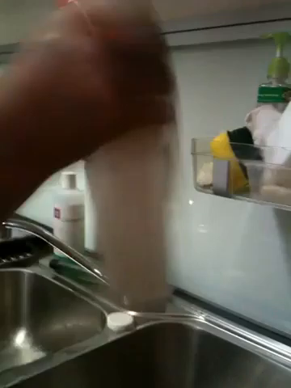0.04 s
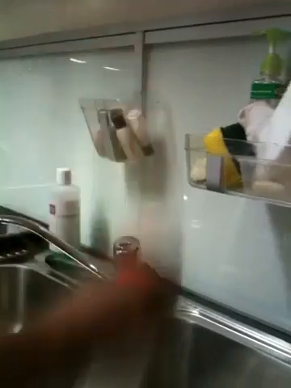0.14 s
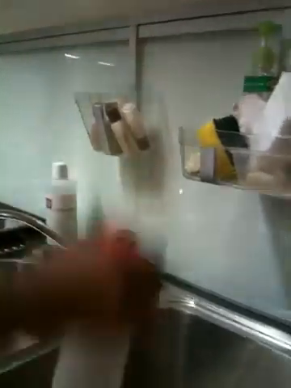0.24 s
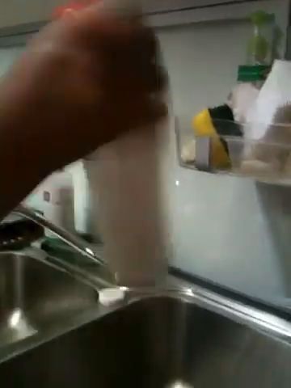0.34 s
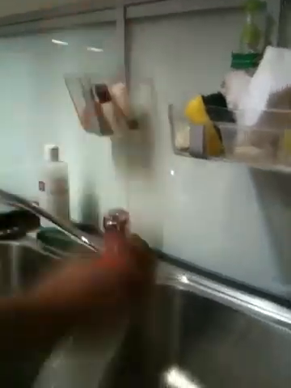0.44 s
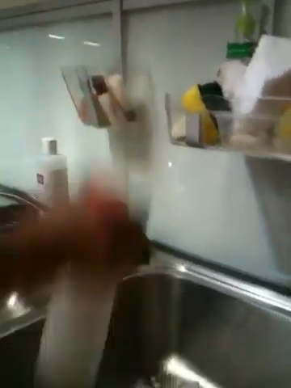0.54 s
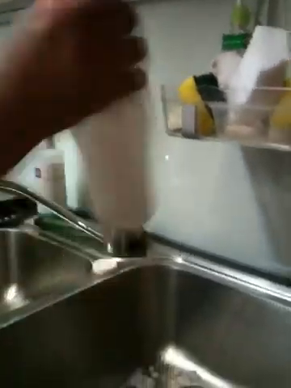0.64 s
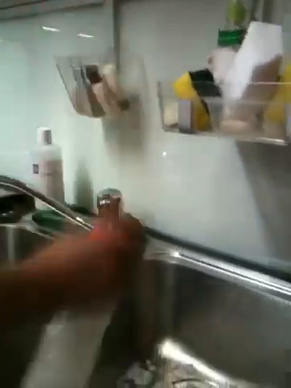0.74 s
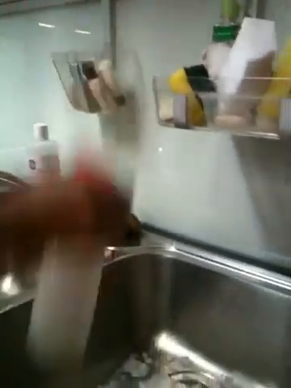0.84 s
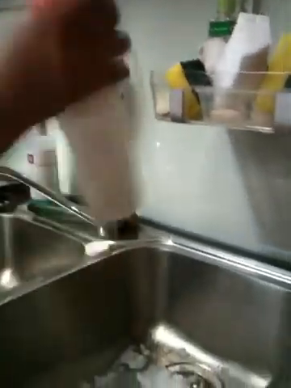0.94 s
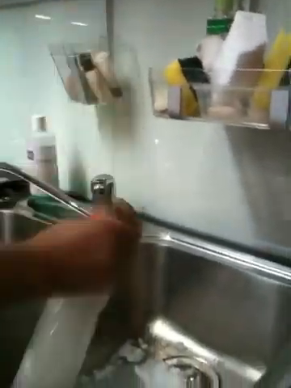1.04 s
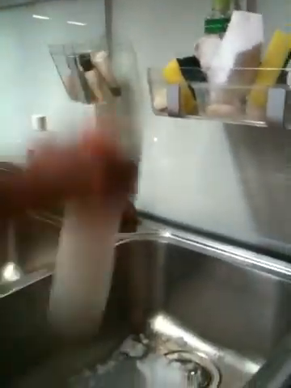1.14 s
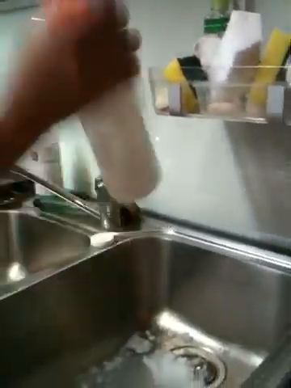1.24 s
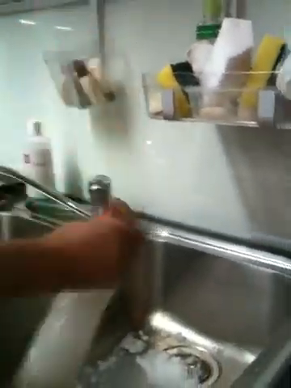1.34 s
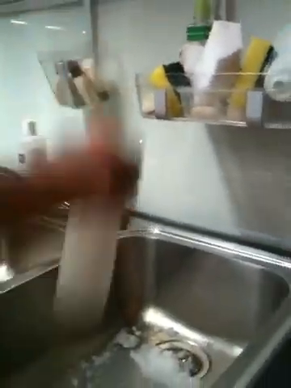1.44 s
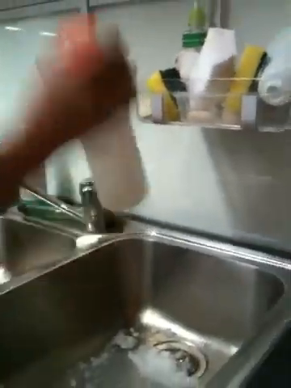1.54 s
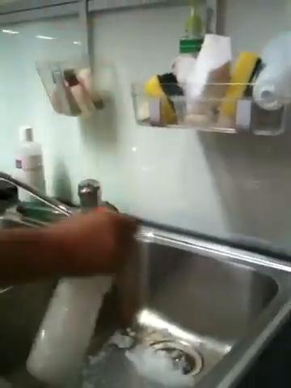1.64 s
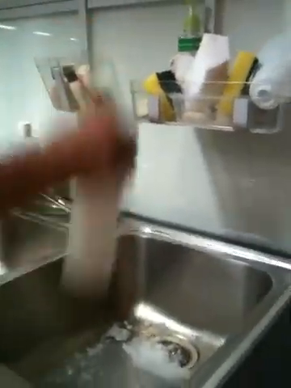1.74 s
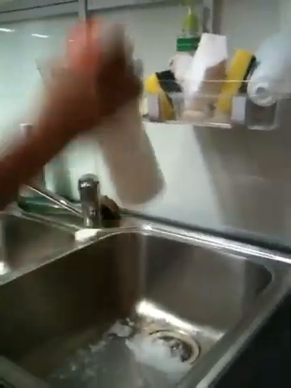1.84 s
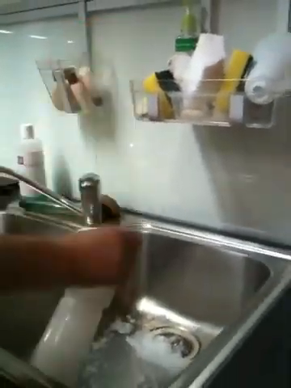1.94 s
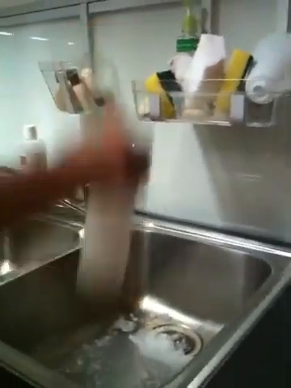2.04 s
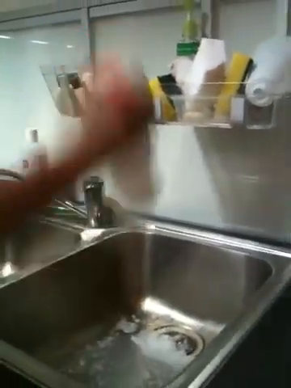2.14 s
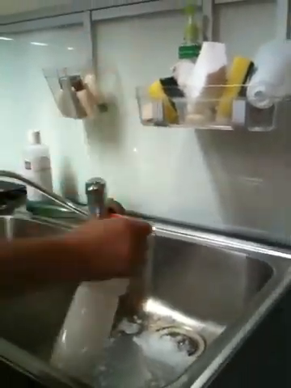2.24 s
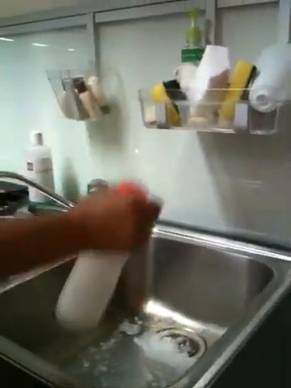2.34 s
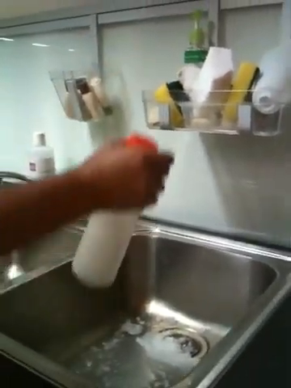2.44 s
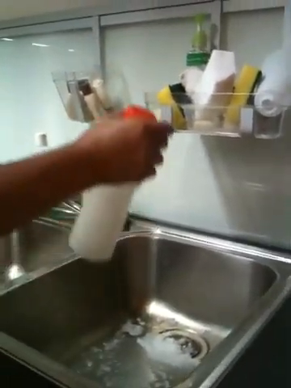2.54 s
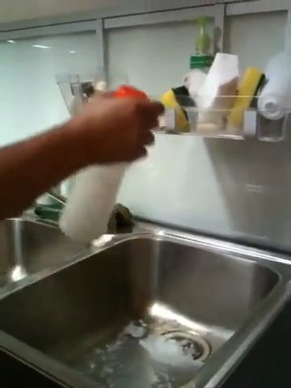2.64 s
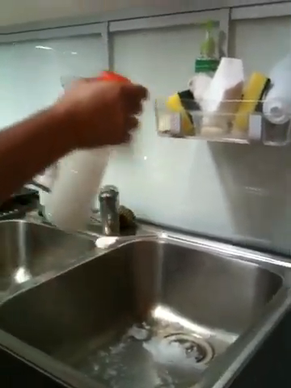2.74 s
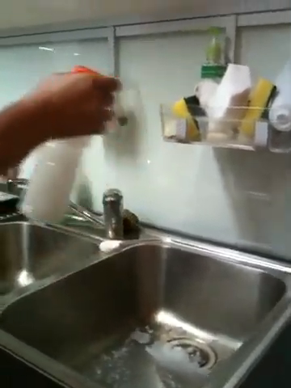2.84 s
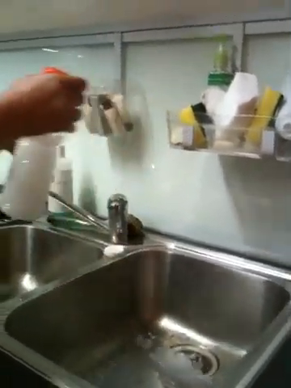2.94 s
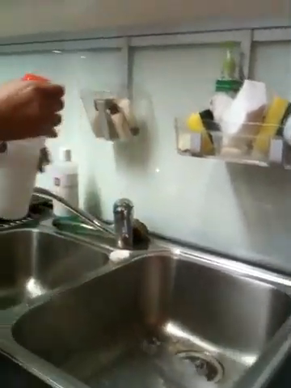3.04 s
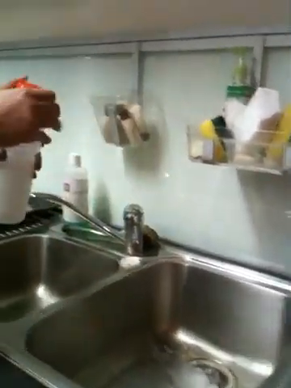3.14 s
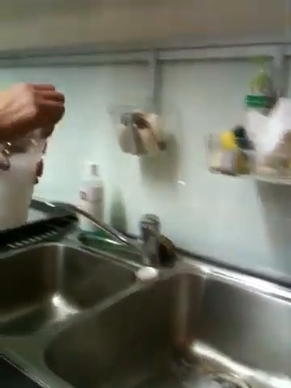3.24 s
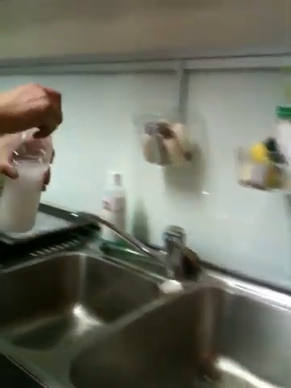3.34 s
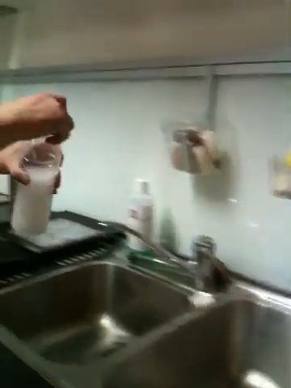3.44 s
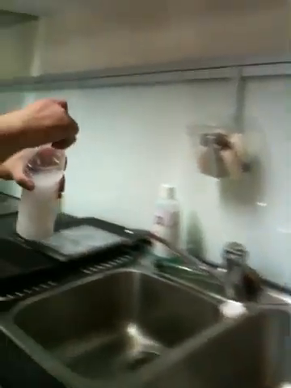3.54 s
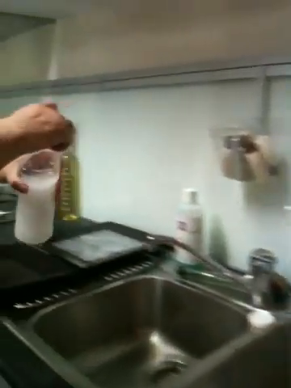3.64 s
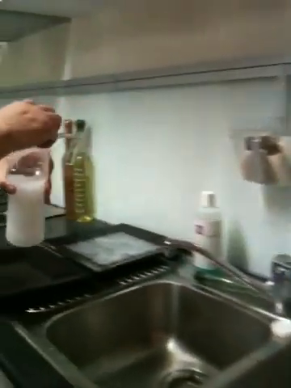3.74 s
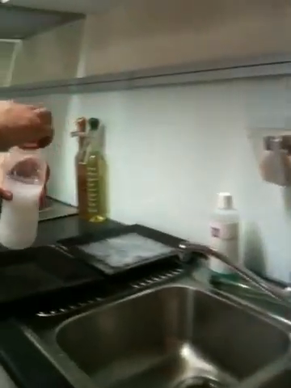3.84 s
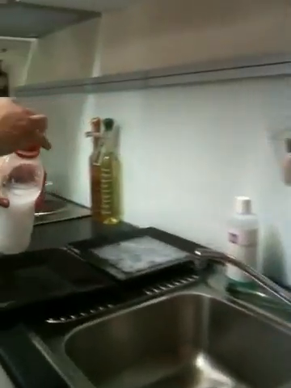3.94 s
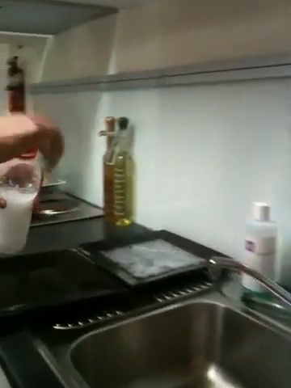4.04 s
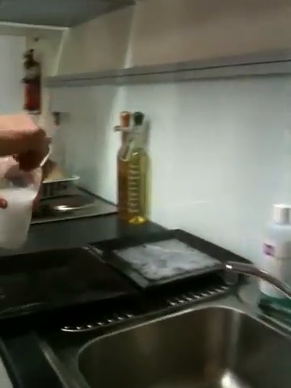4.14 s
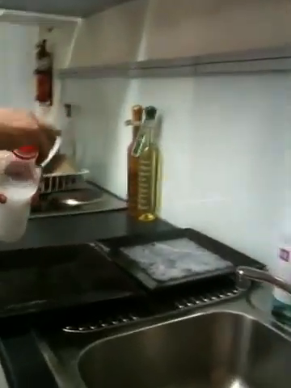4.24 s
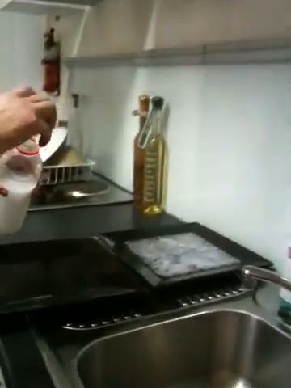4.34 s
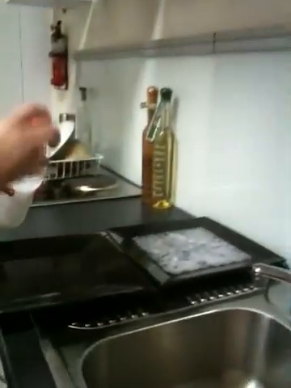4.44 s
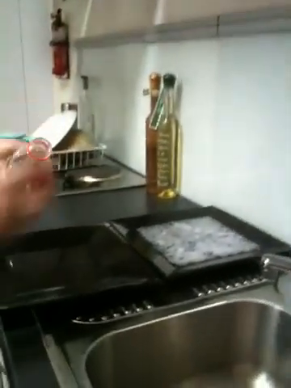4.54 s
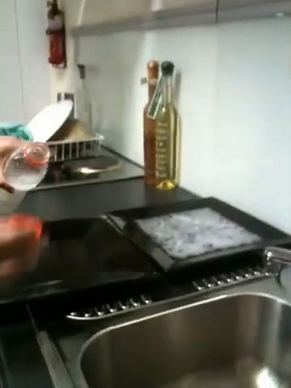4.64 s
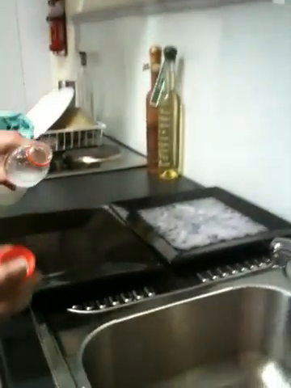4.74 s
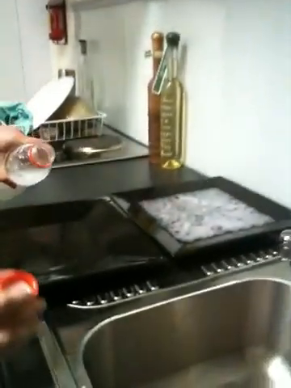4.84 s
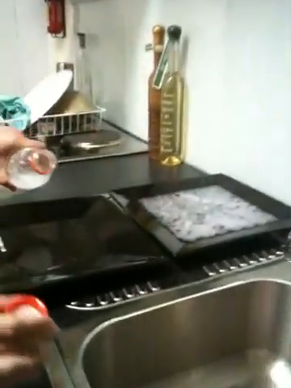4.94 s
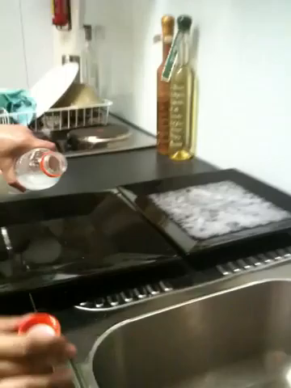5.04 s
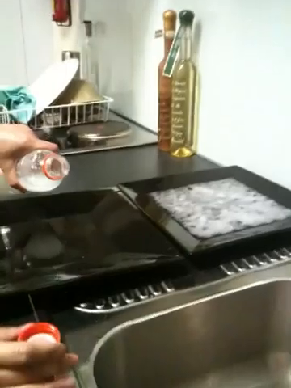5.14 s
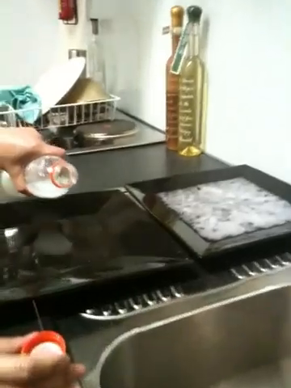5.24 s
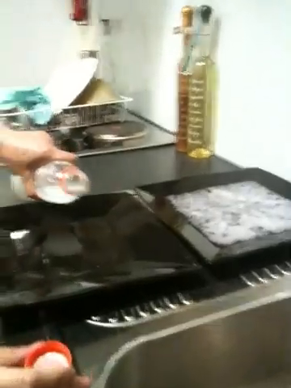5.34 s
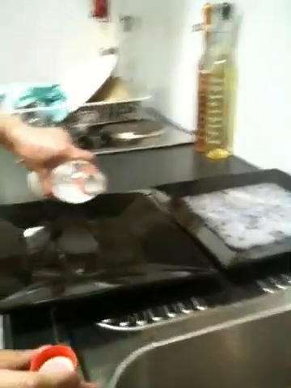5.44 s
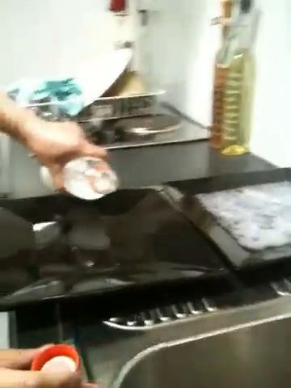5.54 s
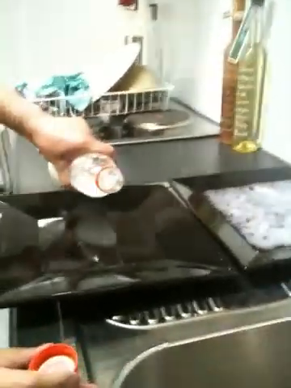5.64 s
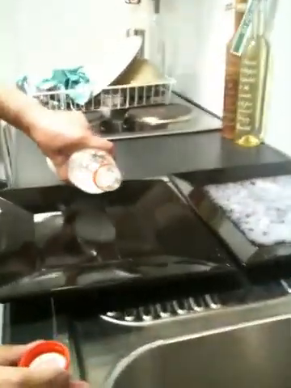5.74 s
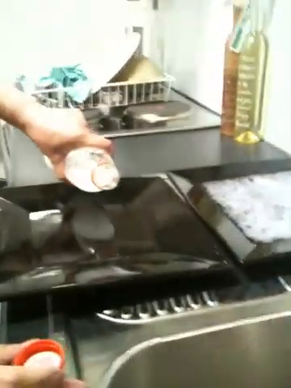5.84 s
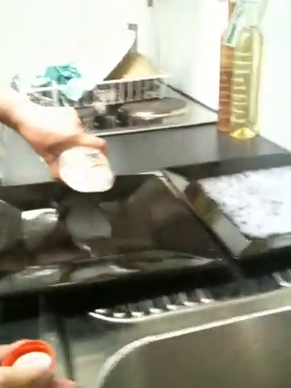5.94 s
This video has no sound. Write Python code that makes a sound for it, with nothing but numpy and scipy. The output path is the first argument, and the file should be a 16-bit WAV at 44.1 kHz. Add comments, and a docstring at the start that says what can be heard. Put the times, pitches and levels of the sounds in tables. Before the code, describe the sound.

A plastic bottle of water and soaked paper is shaken hard close to the microphone, about three strokes a second, each with splashing, wet slaps and hollow gulps. The shaking stops and the water settles with a few plops. Fingers then turn the screw cap, making light clicks, faint squeaks and one sharp crack. A low rumble and faint hum hang in the small tiled kitchen.

```python
"""A tiled kitchen: a plastic bottle of water and soaked paper is shaken hard, three strokes a second. Each
stroke throws the pulp against the wall: spray, slaps and gulping air pockets. The water settles with last ticks
and plops, and fingers turn the screw cap, which clicks while drops ring inside the tilted bottle. A faint hum
and thin whistles hang in the room noise."""
import sys
import numpy as np
from scipy import signal
from scipy.fft import rfft, irfft, next_fast_len
from scipy.io import wavfile
from scipy.ndimage import map_coordinates

SR = 44100
rng = np.random.default_rng(int(sys.argv[2]) if len(sys.argv) > 2 else 0)


def materialize(psi):
    """Save the field psi as 16-bit PCM at rate SR to the path in sys.argv[1].

    A 1-D psi becomes a single channel; in a 2-D psi each row is a channel.
    """
    bounded = np.clip(np.atleast_2d(psi).T, -1, 1)
    quanta = np.round(bounded * 32767).astype(np.int16)
    wavfile.write(sys.argv[1], SR, quanta)


N = 264133

# house rumble (frequency [Hz], relative density [dB])
RUMBLE_SPECTRUM = [(15, -90), (25, -66.5), (69, -28.5), (110, -18), (152, -7.5), (264, -9), (400, -11.5),
                   (499, -13.5), (600, -18.5), (831, -19.5), (4000, -41), (8800, -120)]
# hum that drops out and returns (time [s], level [dB])
HUM_LEVELS = [(3.1, -66.5), (3.5, -88), (3.77, -68.5), (3.95, -65), (4.45, -61.5), (5.99, -64.5)]
# thin whistles (frequency [Hz], level [dB])
WHISTLES = [(15628, -73), (15030, -80.5)]
# decay of the tiled room (frequency [Hz], t60 [s])
ROOM_DECAY = [(200, 0.53), (2000, 0.51), (7000, 0.28), (14000, 0.19)]
# preamp hiss (frequency [Hz], relative density [dB])
HISS_SPECTRUM = [(1000, -2.5), (3000, -0.5), (8000, -4), (12000, -4.5), (15500, -4.5), (16200, -23.5),
                 (17000, -18)]
# cavities in front of the microphone (frequency [Hz], width [Hz], lift [dB])
MIC_CAVITIES = [(2435, 810, 6), (6595, 700, 12.5)]
# struck or rubbed plastic (frequency [Hz], relative density [dB])
PLASTIC_SPECTRUM = [(200, -92.5), (700, -34), (1200, -3), (2500, 2.5), (5000, -2), (9000, -10.5),
                    (13000, -9), (17000, -41)]
# fingers rubbing the cap (time [s], level [dB])
RUB_LEVELS = [(2.7, -93), (2.93, -78), (3.15, -73.5), (3.27, -70), (3.42, -72.5), (3.5, -75), (3.7, -84),
              (4.1, -85), (4.26, -68), (4.43, -78.5), (4.7, -87)]
# hand bumping the bottle (time [s], level [dB], t60 [s])
HAND_BUMPS = [(3.092, -52.5, 0.38), (3.255, -47, 0.039), (3.47, -58, 0.12), (3.58, -50.5, .1),
              (3.615, -56.5, 0.77), (3.91, -41, 0.074)]
# cap resonances (frequency [Hz], width [Hz], gain [dB])
CAP_MODES = [(2260, 500, -7), (2740, 500, -10), (3406, 630, -12), (6380, 950, -5), (7430, 1600, -5.5)]
# last water ticks, then cap clicks
# (time [s], level [dB], brightness [dB], hollow ring [dB], rise [s], t60 [s])
SHARP_TICKS = [(2.552, -54.5, -2, -4, .002, 0.069), (2.563, -45, -7.5, -10, 0.00091, 0.038),
               (2.862, -68, -13, -3.5, .0015, 0.15), (2.893, -66, -19, 8, .001, 0.044),
               (3.092, -56.5, -5.5, 4, .001, 0.038), (3.181, -56, -13, -2, .002, 0.048),
               (3.195, -57.5, -20, 0, .0015, .05), (3.215, -54.5, -15, 1, .0015, 0.073),
               (3.235, -55, -3, -6, .002, .088), (3.253, -49, -2, -8, .002, .04),
               (3.3, -58, -2, 1, .003, 0.036), (3.3337, -47, -5, 4, 0.00068, 0.067),
               (3.381, -54, -8, 2, .0015, .045), (3.394, -65, -10, 13, .0015, .034),
               (3.411, -63, -20, 13.5, .0015, 0.041), (3.646, -62, -13, 1, .001, 0.056),
               (3.7176, -32, 6.5, -11.5, 0.0024, 0.031), (3.721, -34, 10.5, -12, 0.0019, .025),
               (3.7274, -46, 11, -10.5, 0.0018, 0.028), (3.825, -58.5, 10, -8, .001, 0.025),
               (3.904, -43.5, -4.5, 1.5, 0.0015, 0.044), (3.915, -42, -13, 2.5, 0.00036, 0.085),
               (4.017, -55, -8, -7.5, .0015, 0.032), (4.038, -47.5, -6.5, 3, .0009, 0.065),
               (4.139, -61, 1, -6, .0005, 0.038), (4.191, -51, -5, -1.5, 0.00073, 0.055),
               (4.254, -56.5, -15, -2, .004, .12), (4.305, -55, -12, 5, 0.0035, .07),
               (4.371, -51, -7, 8, 0.00052, 0.048), (4.83, -61.5, -12, -4, .001, .047),
               (5.525, -65.5, -5, -3, .001, .055)]
# water plops and drops settling inside the tilted bottle (time [s], level [dB], pitch [Hz], t60 [s])
PITCHED_RINGS = [(2.511, -42.5, 1610, 0.038), (2.54, -45.5, 1050, .06), (2.611, -54.5, 1020, 0.092),
                 (2.659, -58, 9800, 0.041), (2.765, -67, 8300, .05), (2.925, -56, 1560, .03),
                 (3.254, -53, 1000, .04), (3.647, -60, 920, .065), (4.178, -60.5, 1450, 0.14),
                 (4.254, -61, 1940, 0.15), (4.83, -57, 3510, 0.042), (5.525, -60.5, 2100, 0.059)]
# turns of the downstrokes (time [s], air push [dB], gurgle [dB])
STROKE_TURNS = [(.14, -66, -40), (.434, -82, -46.5), (0.733, -57, -44), (1.033, -58, -43.5),
                (1.322, -74, -48.5), (1.63, -64, -43.5), (1.908, -80, -44.5), (2.199, -61, -43.5)]
# bottle wall and air modes (frequency [Hz], width [Hz], gain [dB])
BOTTLE_MODES = [(105.5, 14, -9.5), (234.7, 35, -1), (489, 77, -5.5), (767, 190, -3), (1040, 120, -2)]
# large air pockets (time [s], level [dB], pitch [Hz], life [s])
AIR_POCKETS = [(.005, -46, 740, 0.04), (.175, -32.5, 483, 0.021), (.146, -42, 480, .02),
               (.175, -37.5, 206, .038), (.215, -38, 793, .03), (.18, -31, 676, 0.02),
               (.445, -45, 489, 0.033), (.468, -33.5, 520, 0.0091), (.485, -40, 729, 0.05),
               (.54, -35, 855, 0.017), (.52, -40.5, 500, .056), (.55, -37, 505.6, 0.056),
               (.585, -38, 232, 0.024), (.731, -43, 600, .02), (.745, -34.5, 340, 0.026),
               (.765, -32, 699, 0.036), (.83, -39.5, 225, 0.032), (.838, -37, 1100, 0.022),
               (1.05, -36, 643, 0.025), (1.055, -43, 195, 0.033), (1.075, -42, 731, .06),
               (1.118, -33, 1066, 0.028), (1.165, -33, 503, 0.015), (1.325, -40, 990, 0.012),
               (1.415, -35.5, 245.3, 0.041), (1.67, -35.5, 735, .031), (1.67, -36, 930, 0.021),
               (1.7, -41, 480, 0.039), (1.952, -35.5, 838, 0.028), (1.952, -37, 1060, 0.019),
               (1.96, -34.5, 235, 0.025), (2.015, -41, 831, 0.036), (2.018, -39.5, 268, 0.037),
               (2.235, -40, 264, 0.029), (2.29, -33.5, 1110, 0.012), (2.292, -37, 776, 0.022),
               (2.29, -40.5, 228.5, 0.044), (2.292, -34, 1634, 0.022)]
# droplet impacts (frequency [Hz], relative density [dB])
SPRAY_SPECTRUM = [(60, -58), (300, -8), (1000, -5), (2000, 2), (4000, -3.5), (8000, -10.5), (12000, -10.5),
                  (15500, -20), (17000, -50)]
# pulp slapping the wall (time [s], level [dB], brightness [dB], t60 [s])
PULP_SLAPS = [(.004, -50, 10, 0.072), (0.147, -39.5, -14, .09), (.161, -44, 4, 0.1),
              (0.2442, -33.5, 6.5, 0.072), (.32, -42, 8, 0.07), (0.419, -38.5, -7, 0.03),
              (.4344, -45, -11, 0.054), (.467, -37, 7.5, 0.099), (.4884, -40, 6, .07), (.5524, -51, 5, .06),
              (0.672, -39, -2, 0.031), (.75, -39, 6.5, 0.083), (.7744, -60, 0, .07),
              (.8424, -47.5, -0.5, 0.053), (1.037, -43, -12, .1), (1.052, -43, 7.5, .1),
              (1.067, -43, 6, 0.13), (1.1014, -39, 8, 0.044), (1.14, -43, -7, 0.091),
              (1.1874, -42, -3, 0.034), (1.2294, -43.5, 2, 0.068), (1.326, -45.5, -4, .08),
              (1.341, -41, 8, 0.095), (1.4394, -56, -1, 0.051), (1.632, -40.5, -5, .07),
              (1.6425, -40.5, 16, 0.064), (1.7987, -40, -23, 0.084), (1.9175, -56, -12, .08),
              (1.948, -43, -5, .11), (2.0223, -47, 6, 0.08), (2.202, -49, -9, .1), (2.221, -37.5, -4, .08),
              (2.2935, -39.5, 10, 0.099), (2.408, -50, -2.5, .06), (2.43, -43.5, -5, 0.051)]
# water thrown to the bottom and back (surge peak [s], rise [s], spray [dB], gulp [dB],
# wait to return [s], return spray [dB], return gulp [dB], spray drain [dB/s])
SURGES = [(-.08, .03, -32, -31, 0.085, -34, -39, 248), (0.188, 0.053, -35.5, -40, 0.083, -33.5, -43.5, 145),
          (.485, 0.043, -34.5, -40, 0.071, -32.5, -40.5, 148),
          (0.776, 0.039, -32.5, -40.5, 0.09, -32.5, -40, 150),
          (1.064, 0.02, -32, -42, 0.099, -35, -40, 168),
          (1.36, .03, -35.5, -44, 0.082, -31.5, -40.5, 148.5),
          (1.655, 0.042, -35, -46, 0.077, -32.5, -41, 160),
          (1.965, 0.056, -36.5, -44.5, 0.074, -33, -42.5, 119),
          (2.228, 0.028, -35, -44, 0.079, -37, -41.5, 112)]

SETTLED_S = 2.6


def amp(db):
    """dB to gain."""
    return 10 ** (np.asarray(db) / 20)


def unit(x):
    """x at rms 1."""
    return x / np.sqrt(np.mean(x ** 2) + 1e-20)


def along(points, hz):
    """Interpolate (Hz, value) points on a log axis."""
    f, v = np.transpose(points)
    return np.interp(np.log(hz + 1), np.log(f + 1), v)


def curve(points):
    """Interpolate (s, value) points per sample."""
    return np.interp(np.arange(N) / SR, *np.transpose(points))


def wobble(rate_hz):
    """Smooth random curve with knots at rate_hz."""
    knots = rng.standard_normal(int(N * rate_hz / SR) + 4)
    return map_coordinates(knots, [np.arange(N) * rate_hz / SR])


def filtered(x, response):
    """Apply a complex frequency response."""
    m = next_fast_len(len(x) + SR // 2)
    return irfft(rfft(x, m) * response(np.fft.rfftfreq(m, 1 / SR)), m)[:len(x)]


def coloured(x, spectrum):
    """x shaped by (Hz, dB) points, rms 1."""
    return unit(filtered(x, lambda hz: amp(along(spectrum, hz))))


def split(x, hz):
    """Low and high part of x."""
    high = filtered(x, lambda f: (1j * f / (hz + 1j * f)) ** 2)
    return x - high, high


def peak(f, hz, width_hz):
    """Causal resonance, gain 1 at its centre."""
    return 1j * f * width_hz / (hz * hz - f * f + 1j * f * width_hz)


def ring(hz, width_hz, samples=SR // 4):
    """Damped plastic or a small air pocket: noise in one resonance."""
    return unit(filtered(rng.standard_normal(samples), lambda f: peak(f, hz, abs(width_hz)) ** 2))


def burst(rise_s, t60_s):
    """Envelope: quick rise, exponential fall."""
    t = np.arange(SR // 4) / SR
    return amp(-60 * t / t60_s) * (1 - np.exp(-t / rise_s))


def struck(envelope, noise):
    """Enveloped noise with the energy of the envelope."""
    sound = envelope[:len(noise)] * noise
    return sound * np.linalg.norm(envelope) / np.linalg.norm(sound)


def add(track, at_s, sound):
    """Mix sound into track."""
    start = round(at_s * SR)
    track[start:][:len(sound)] += sound[:N - start]


def bubbles(at_s, hz, gain, life_s, glide):
    """Sines that swell and die; the pitch slides as the pocket changes size."""
    t = np.arange(SR // 8) / SR
    age = t / np.reshape(life_s, (-1, 1))
    envelope = (3 * age * np.exp(1 - 3 * age)) ** 1.5
    phase = 2 * np.pi * hz[:, None] * t * (1 + np.reshape(glide, (-1, 1)) * age)
    waves = gain[:, None] * envelope * np.sin(phase)
    index = (at_s * SR).astype(int)[:, None] + np.arange(len(t))
    return np.bincount(index.ravel(), waves.ravel(), N + SR)[:N]


def room_noise(rumble_db=-63, hum_hz=300):
    """House rumble, a wavering hum and thin whistles."""
    t = np.arange(N) / SR
    rumble = amp(rumble_db + 0.4 * wobble(6)) * coloured(rng.standard_normal(N), RUMBLE_SPECTRUM)
    hum = amp(curve(HUM_LEVELS) + 2.1 * wobble(8)) * np.sin(2 * np.pi * hum_hz * t + 0.6 * wobble(23))
    whistles = sum(amp(db + 1.5 * wobble(12)) * np.sin(2 * np.pi * hz * t) for hz, db in WHISTLES)
    return rumble + hum + whistles


def tiled_walls(x):
    """Reverberation; each frequency dies at its own rate."""
    hz, t, noise = signal.stft(rng.standard_normal(SR // 2), SR, nperseg=256)
    tail = signal.istft(noise * amp(-60 * t / along(ROOM_DECAY, hz)[:, None]), SR, nperseg=256)[1]
    return signal.fftconvolve(np.pad(x, (200, 0)), tail / np.linalg.norm(tail))[:N]


def air_pushes(swing_hz=36):
    """Each downstroke pushes one slow pressure swing at the microphone."""
    at_s, db, _ = np.transpose(STROKE_TURNS)
    return bubbles(at_s, np.full(len(at_s), swing_hz), amp(db), life_s=0.029, glide=0)


def hand():
    """Fingers rub the cap; the hand bumps the bottle dully."""
    low, high = split(coloured(rng.standard_normal(N), PLASTIC_SPECTRUM), 5000)
    rub = amp(curve(RUB_LEVELS) + 2.9 * wobble(40)) * (low + amp(4.5) * high)
    blows = np.zeros(N)
    for at_s, db, t60_s in HAND_BUMPS:
        add(blows, at_s, amp(db) * burst(0.0014, t60_s))
    body = filtered(rng.standard_normal(N), lambda f: peak(f, 215, 80) + 0.1 * peak(f, 700, 700) ** 2)
    _, bumps = split(blows * unit(body), 120)
    return rub + bumps


def plops_and_drops():
    """Water plops and drops settling inside the bottle: one resonance each, wider if short or high."""
    track = np.zeros(N)
    for at_s, db, hz, t60_s in PITCHED_RINGS:
        width_hz = 8 / t60_s + 0.08 * hz
        add(track, at_s, amp(db) * struck(burst(.002, t60_s), ring(hz, width_hz)))
    return track


def ticks():
    """Last water ticks, then cap clicks: broad cracks and the rings they excite in the plastic."""
    low, high = split(coloured(amp(2.06 * wobble(400)) * rng.standard_normal(N), PLASTIC_SPECTRUM), 4000)
    cracks, rings = np.zeros((2, N))
    modes = [ring(hz, width_hz, samples=N) for hz, width_hz, _ in CAP_MODES]
    for at_s, db, bright_db, hollow_db, rise_s, t60_s in SHARP_TICKS:
        blow = burst(rise_s, t60_s)
        span = slice(round(at_s * SR), round(at_s * SR) + len(blow))
        add(cracks, at_s, amp(db) * struck(blow, low[span]))
        add(cracks, at_s, amp(db + bright_db) * struck(blow, high[span]))
        for (hz, _, mode_db), mode in zip(CAP_MODES, modes):
            ring_db = db + mode_db + (bright_db if hz > 4000 else hollow_db) + rng.normal(0, 2)
            add(rings, at_s, amp(ring_db) * struck(blow, mode[span]))
    return cracks, rings


def churn(rise_db=25.5, sag_db_per_s=90, return_db_per_s=250, drain_db_per_s2=298.5):
    """Spray and gulp levels [dB]: a steep surge that sags, a return, a steepening drain."""
    t = np.arange(N) / SR
    spray_power, gulp_power = np.full((2, N), 1e-12)
    for at_s, rise_s, spray_db, gulp_db, wait_s, back_spray_db, back_gulp_db, drain_db_per_s in SURGES:
        surge_s = t - at_s
        back_s = surge_s - wait_s
        sag_db = -sag_db_per_s * surge_s - 1000 * np.maximum(back_s, 0)
        surge_db = np.where(surge_s < 0, rise_db * surge_s / abs(rise_s), sag_db)
        climb_db = return_db_per_s * back_s + 3000 * np.minimum(surge_s, 0)
        back_db = np.where(back_s < 0, climb_db, -drain_db_per_s * back_s - drain_db_per_s2 * back_s ** 2)
        spray_power += amp(spray_db + surge_db) ** 2 + amp(back_spray_db + back_db) ** 2
        gulp_power += amp(gulp_db + 1.3 * surge_db) ** 2 + amp(back_gulp_db + 0.92 * back_db) ** 2
    return 10 * np.log10(spray_power), 10 * np.log10(gulp_power)


def slaps():
    """Pulp hits the wall: envelopes of the slap and its slower treble sheen."""
    slap, sheen = np.zeros((2, N))
    for at_s, db, bright_db, t60_s in PULP_SLAPS:
        add(slap, at_s, amp(db) * burst(0.00077, t60_s))
        add(sheen, at_s, amp(db + bright_db) * burst(0.004, t60_s))
    return slap, sheen


def froth(count=700):
    """Small bubbles burst: short, high, widely varied in size."""
    when, pitch, size = rng.random((count, 3)).T
    hz = 1100 * 5.54 ** pitch
    return unit(bubbles(when * SETTLED_S, hz, amp(-6 * np.log(size + 0.013)), life_s=16 / hz, glide=.07))


def bottle_response(f):
    """Wall and air modes in alternating polarity, treble rolled off."""
    modes = sum((-1) ** k * amp(db) * peak(f, hz, width_hz)
                for k, (hz, width_hz, db) in enumerate(BOTTLE_MODES))
    return modes / (1 + (f / 1500) ** 2)


def gulps(gulp_db, slap, count=600):
    """Trapped air bubbles and rings the bottle's modes; a gurgle opens each downstroke's surge."""
    gurgle = np.zeros(N)
    for at_s, _, db in STROKE_TURNS:
        add(gurgle, at_s, amp(db) * burst(.003, t60_s=0.31))
    when, pitch, size = rng.random((count, 3)).T
    hz = 300 * 9 ** pitch
    pockets = bubbles(when * SETTLED_S, hz, amp(-14 * size), life_s=14 / hz, glide=.06)
    thud = filtered(amp(2.3 * wobble(60)) * rng.standard_normal(N), bottle_response)
    return (amp(gulp_db) + gurgle + amp(-14) * slap) * unit(unit(thud) + 0.45 * unit(pockets))


def glug_glide(at_s, fade_s=.05):
    """A pocket's pitch climbs most at the turn of a stroke."""
    gap_s = np.abs(at_s[:, None] - np.array(STROKE_TURNS)[:, 0]).min(axis=1)
    return 0.149 * np.exp(-gap_s / fade_s)


def glugs(gulp_db, count=60, flutter_db=1.36):
    """Large air pockets, and random lesser ones near the bottle's modes; froth flutters both."""
    flutter = amp(flutter_db * wobble(180))
    at_s, db, hz, life_s = np.transpose(AIR_POCKETS)
    large = bubbles(at_s, hz, amp(db), life_s, glug_glide(at_s))
    when, pick, detune, size = rng.random((count, 4)).T
    modes_hz = np.array(BOTTLE_MODES)[1:, 0]
    small_hz = modes_hz[(pick * len(modes_hz)).astype(int)] * (.88 + 0.275 * detune)
    small_s = when * SETTLED_S
    small = bubbles(small_s, small_hz, amp(-8 * size), life_s=0.025, glide=glug_glide(small_s))
    return flutter * (large + amp(gulp_db - 5.5) * small)


def spray(spray_db, slap, sheen, spread_db=2.0, clump_db=0.92):
    """Dense droplet impacts, a few large among many small; each band clumps partly on its own."""
    sizes = amp(spread_db * np.minimum(rng.exponential(size=N), 5))
    low, high = split(coloured(sizes * rng.standard_normal(N), SPRAY_SPECTRUM), 2790)
    mid, top = split(high, 6000)
    clumps = 0.96 * wobble(21.96) + wobble(70) + wobble(250)
    low, mid, top = [amp(clump_db * (clumps + 0.24 * wobble(60))) * band for band in (low, mid, top)]
    mist = amp(0.093 * (spray_db + 34.5))  # harder churning throws finer, brighter mist
    return (amp(spray_db) + slap) * low + (amp(spray_db + 3.0) + sheen) * (mid + mist * top)


def water():
    """Surges and slaps drive spray, froth and trapped air."""
    spray_db, gulp_db = churn()
    slap, sheen = slaps()
    splash = spray(spray_db, slap, sheen) + amp(spray_db - 13.5) * froth()
    return splash + gulps(gulp_db, slap) + glugs(gulp_db)


def scene():
    """Bottle near the microphone; small rings reach the walls more weakly than broad cracks."""
    slosh = water()
    cracks, tick_rings = ticks()
    rings = tick_rings + plops_and_drops()
    contacts = cracks + hand()
    reverb = tiled_walls(amp(-13) * slosh + amp(-8.5) * contacts + amp(-16) * rings)
    return (slosh + contacts + rings + reverb + air_pushes() + room_noise())[None]


def record(dry, hiss_db=-70.5, band_limit_hz=17160):
    """Microphone cavities lift two bands; the preamp hisses; nothing passes the band limit."""
    lifted = filtered(dry[0], lambda f: 1 + sum((amp(db) - 1) * peak(f, hz, width_hz)
                                                for hz, width_hz, db in MIC_CAVITIES))
    hiss = amp(hiss_db) * coloured(rng.standard_normal(N), HISS_SPECTRUM)
    return filtered(lifted + hiss, lambda hz: hz < band_limit_hz)[None]


dry = scene()
out = record(dry)
materialize(out)
```